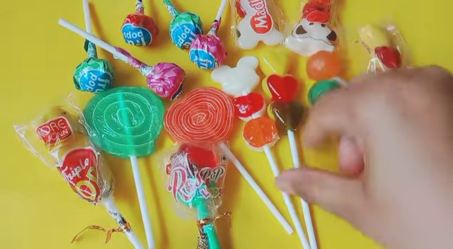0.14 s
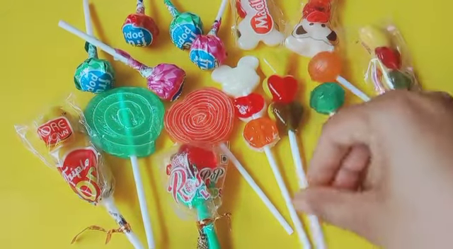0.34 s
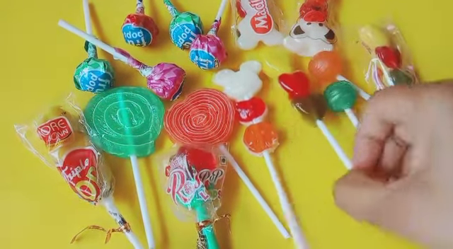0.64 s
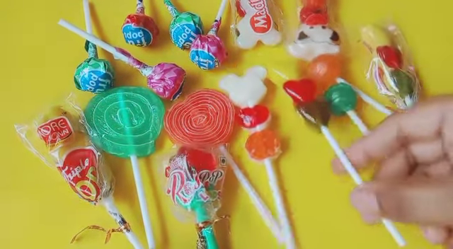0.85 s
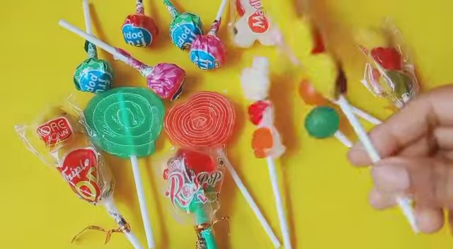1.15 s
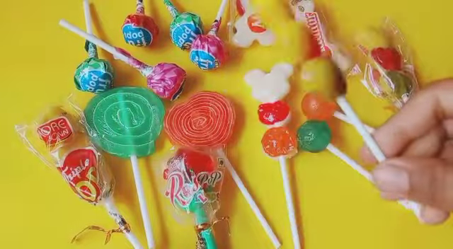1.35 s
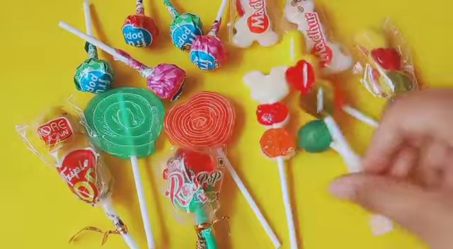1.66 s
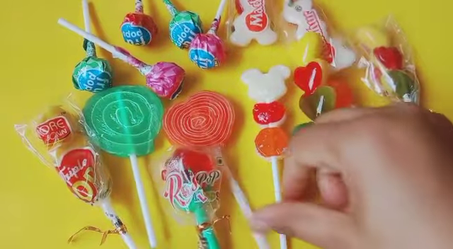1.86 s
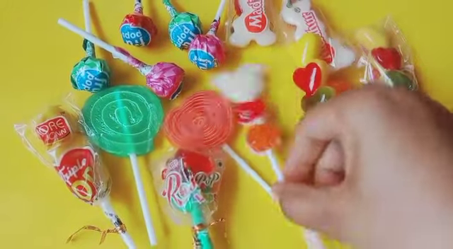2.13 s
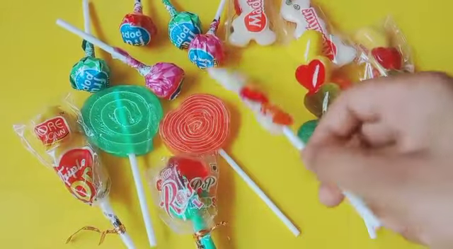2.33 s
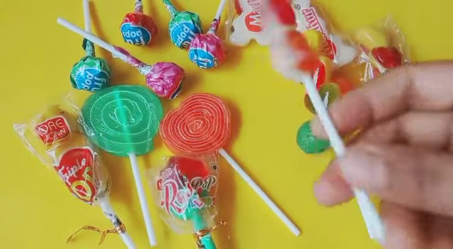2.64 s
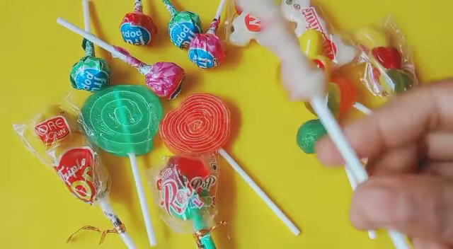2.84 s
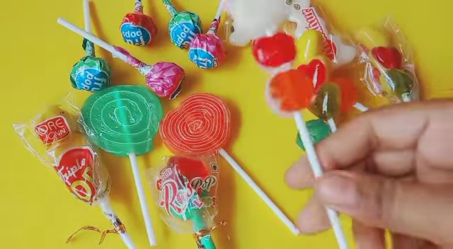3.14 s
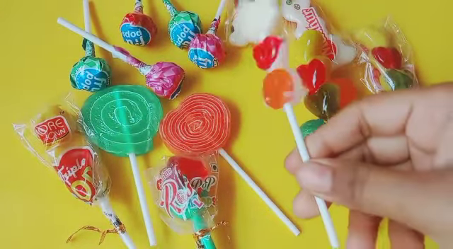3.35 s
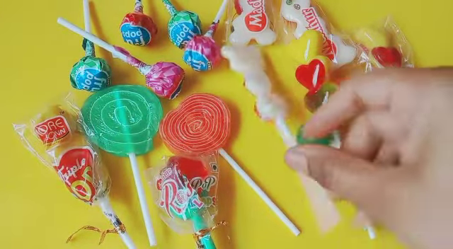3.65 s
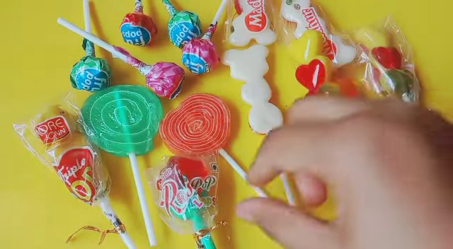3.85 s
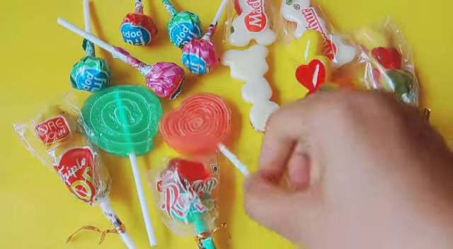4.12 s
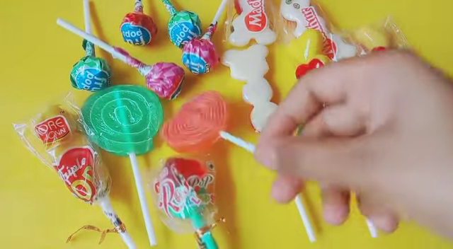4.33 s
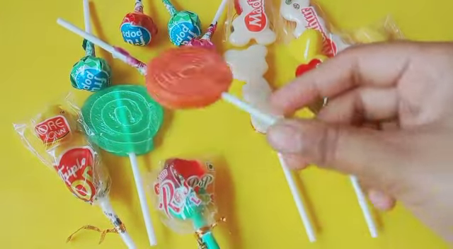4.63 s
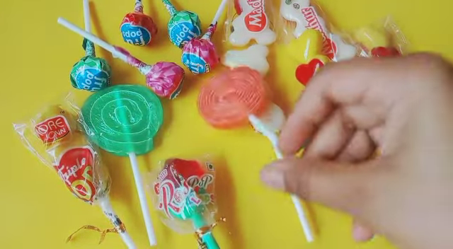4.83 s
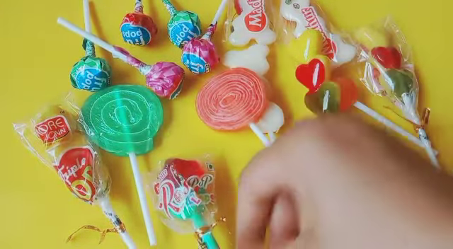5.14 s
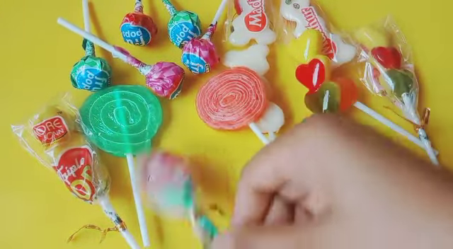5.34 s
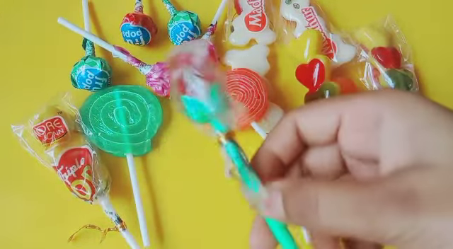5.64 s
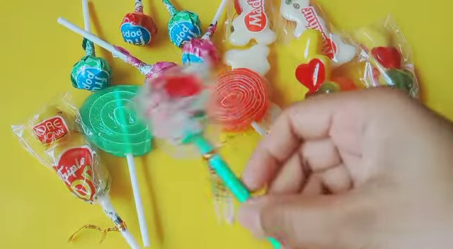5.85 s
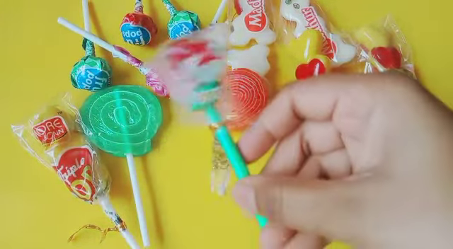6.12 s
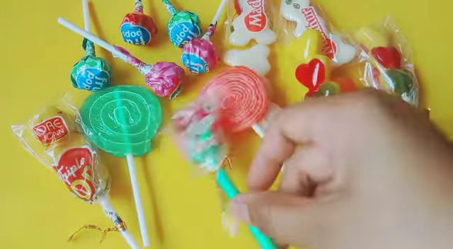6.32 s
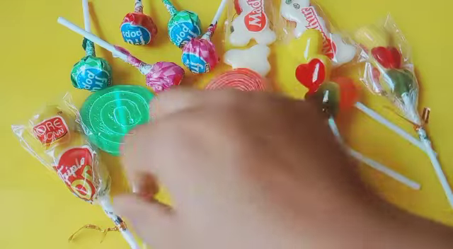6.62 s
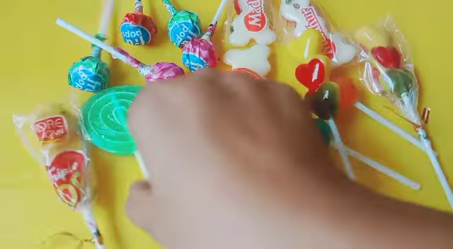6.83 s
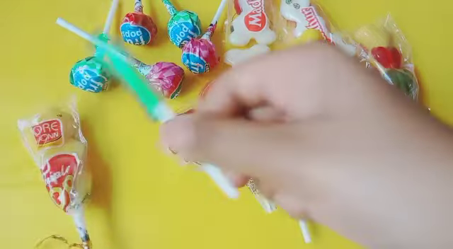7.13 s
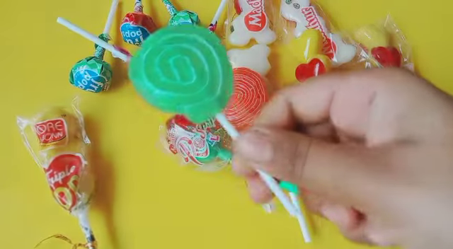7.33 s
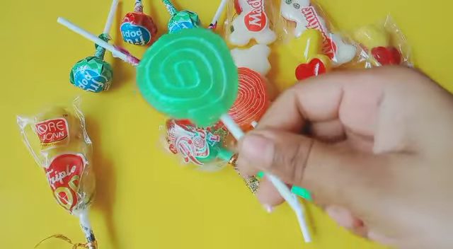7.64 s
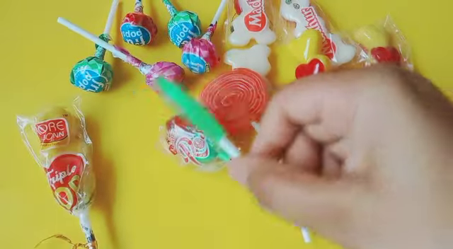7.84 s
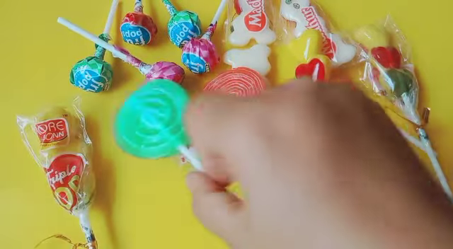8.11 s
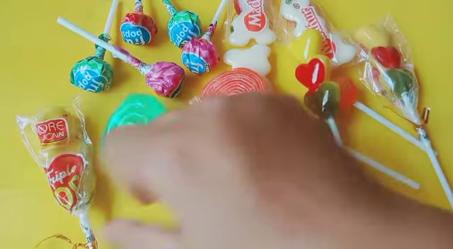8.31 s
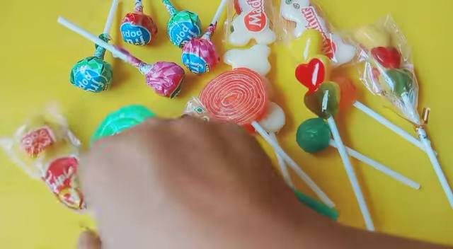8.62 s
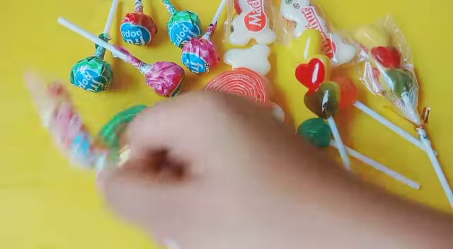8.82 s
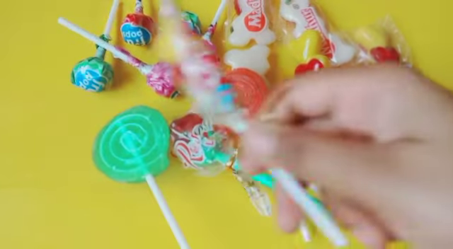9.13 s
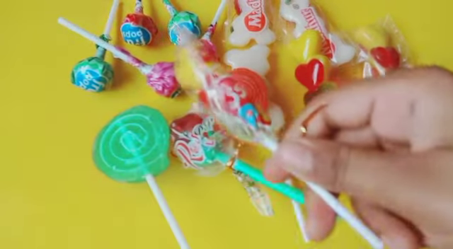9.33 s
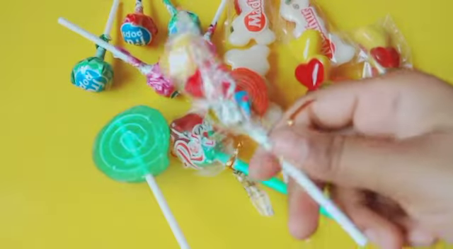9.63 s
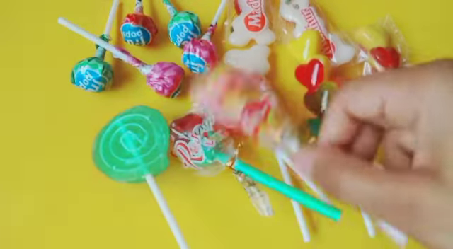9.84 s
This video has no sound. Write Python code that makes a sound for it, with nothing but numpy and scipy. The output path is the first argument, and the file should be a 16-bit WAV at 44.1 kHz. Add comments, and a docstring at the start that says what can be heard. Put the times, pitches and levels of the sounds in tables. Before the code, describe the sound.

Thin plastic sweet wrappers crackle and snap, sparse at first then nearly continuous, with small knocks and scrapes on a light table top, close up.

```python
"""A wrapper crackles and a sweet drags on a light table top, close up, over a low wavering rumble.
Hands pick up and lay down lollipops in a small room: knocks ring the table's modes, slides feed them clicks.
Thin plastic wrappers crackle as showers of clicks ring their facets; single creases snap with a pitch.
Faint narrow hums come and go, and short reflections surround the wrappers and table."""
import sys
import numpy as np
from scipy import signal
from scipy.fft import rfft, irfft
from scipy.io import wavfile
from scipy.ndimage import uniform_filter1d

SR = 44100
rng = np.random.default_rng(int(sys.argv[2]) if len(sys.argv) > 2 else 0)


def unload_wav(signal):
    """Save mono or channel-first audio to the path in sys.argv[1] as 16-bit WAV at rate SR, clipped to [-1, 1]."""
    wavfile.write(
        sys.argv[1],
        SR,
        np.round(np.clip(np.atleast_2d(signal).T, -1, 1) * 32767).astype(np.int16),
    )


N = 439677  # length [samples]

# low room rumble spectrum: (frequency [Hz], density [dB per Hz])
RUMBLE_SPECTRUM = [(20, -28), (45, -18.5), (65, -8), (120, -2.5), (160, -9.5), (200, -3), (300, -14),
                   (500, -15), (1500, -16.5), (3000, -31.5), (5600, -26), (9000, -35.5)]
# fingers squeeze a wrapper: (start [s], length [s], crackle before trim [dB], slack folds against tight ones [dB])
SQUEEZES = [(0.0, 0.0096, -45.5, 10), (0.109, 0.11, -39.5, 15), (0.399, 0.013, -46.5, 15.5),
            (0.463, .05, -50.5, 5.5), (0.709, 0.041, -58, -7.5), (0.846, .1, -50.5, 4.5),
            (0.969, 0.092, -38, 4.5), (1.142, 0.073, -30, 10), (1.255, 0.11, -38.5, 9.5),
            (1.609, 0.23, -41.5, 7.5), (1.922, 0.019, -42.5, 6.5), (2.072, 0.063, -56.5, 14.5),
            (2.154, 0.049, -45.5, 10), (2.626, 0.16, -41.5, 6), (2.884, 0.074, -33, 10),
            (3, 0.15, -32, 2.5), (3.191, 0.19, -27.5, 3.5), (3.416, 0.09, -32, 5.5),
            (3.576, 0.068, -30, 12.5), (3.668, 0.15, -31.5, 6), (4.354, 0.1, -32.5, 5),
            (4.565, 0.024, -28.5, -16.5), (5.12, 0.017, -31.5, 7.5), (5.197, 0.14, -30.5, -4),
            (5.422, 0.074, -30, 4.5), (5.537, 0.017, -32.5, 1), (5.681, 0.041, -29, 0.5),
            (5.743, 0.017, -28, 4.5), (5.903, 0.041, -30, -9), (6.009, 0.067, -33.5, -2.5),
            (6.343, 0.054, -41, 14), (6.529, 0.24, -32, -15.5), (6.84, 0.031, -30.5, 5),
            (6.954, 0.054, -34.5, 2.5), (7.171, 0.13, -33.5, 3.5), (7.444, 0.073, -35, -5.5),
            (7.692, 0.072, -30, -1), (7.758, 0.18, -29.5, 3), (7.978, 0.11, -34, 8), (8.125, 0.035, -27, 6),
            (8.255, 0.16, -29, 5), (8.602, 0.039, -26.5, 0), (8.771, 0.055, -28.5, 1.5),
            (8.892, 0.11, -28, 3.5), (9.198, .14, -29.5, 2.5), (9.418, 0.1, -27, 4),
            (9.589, 0.055, -30, 2.5), (9.73, 0.021, -34, 4.5), (9.853, 0.15, -28.5, 5)]
# wrappers turned in the hand without a break: (time [s], crackle before trim [dB], slack folds [dB])
HANDLING = [(2.84, -99.5, -7), (2.87, -45, -6.5), (3.5, -41, 0.5), (3.88, -50.5, 2.5), (3.92, -40.5, 10),
            (4.3, -43.5, -0.5), (4.5, -34, -17.5), (4.75, -39, -18.5), (4.8, -49, -11), (4.84, -65, -9.5),
            (4.86, -37, -8.5), (4.93, -57, -14.5), (4.96, -40, -11), (5.1, -42, -11.5), (5.6, -41.5, -4),
            (5.85, -38, 2.5), (6.3, -43.5, -1), (6.8, -38.5, 3), (7.12, -42.5, -15.5), (7.3, -33.5, -18),
            (7.68, -41, -16.5), (8.2, -38, 4.5), (8.54, -36, -3), (9.15, -35, 5), (9.36, -36, -2.5),
            (9.7, -34, -4.5), (9.82, -37, -0.5)]
# wrapper as the microphone colours it: (frequency [Hz], density [dB per Hz])
FOIL_SPECTRUM = [(470, -40), (830, -28), (1330, -16), (1770, -12), (2700, -6.5), (3250, -0.5), (4110, -5),
                 (4890, 2), (5680, 4.5), (7010, 1), (9320, -10.5), (14700, -6), (15500, -6.5)]
# sweets and sticks slide over the table: (start [s], length [s], level [dB])
SLIDES = [(0.001, 0.0042, -42.5), (0.077, 0.015, -33), (0.11, 0.012, -21.5), (0.397, 0.0046, -35.5),
          (0.821, 0.2, -48.5), (0.97, 0.029, -42), (1.147, 0.15, -49), (1.645, 0.12, -35.5),
          (1.85, 0.0058, -42.5), (1.923, 0.008, -53.5), (2.14, 0.06, -36), (6.341, 0.025, -40.5),
          (6.72, 0.022, -57), (8.24, 0.025, -51), (8.496, 0.21, -54.5), (8.677, 0.055, -50)]
# sweets knock on the table: (first touch [s], blow level before trims [dB], weight for the low modes [dB])
KNOCKS = [(0.134, -11, -5), (0.178, -14, -17), (0.404, -17.5, -11), (0.482, -27, -17.5), (0.98, -16, -30),
          (1.027, -13.5, -36), (1.04, -19.5, -37), (1.07, -18.5, -44), (1.155, -36, -25.5),
          (1.185, -20, -30), (1.235, -17, 3), (1.263, -0.5, -3.5), (1.61, -9, 1.5), (1.742, -12, -5),
          (2.087, -15, -13), (2.239, -21.5, -11), (2.262, -27.5, -12.5), (3.566, -2, -12),
          (3.696, -2.5, -3), (3.743, -3, -12), (4.156, -36, -15), (4.198, -11, -4), (4.25, -25.5, -21),
          (4.379, -19.5, 4.5), (4.846, -28, 13.5), (4.894, -19.5, 13.5), (4.97, -25.5, -19),
          (5.009, -30.5, 11), (6.342, -22.5, 7), (6.375, -28, -23), (6.42, -15.5, 11.5),
          (6.731, -36.5, 20.5), (6.75, -39, 17.5), (8.248, -31, 25), (8.298, -10.5, -4), (9.863, -14, 13)]
# ringing modes of the table top: (frequency [Hz], level [dB], 60 dB decay of a knock [s])
TABLE_MODES = [(230, 14, 0.099), (331.5, -19, 0.17), (430, -3, 0.068), (502.4, -0.5, 0.062),
               (605, -1.5, 0.029), (725, -8.5, 0.087), (790, -3, 0.053), (952.5, -11.5, 0.27),
               (1060, -3, 0.04), (1186, 7.5, 0.019), (1347, 6, 0.02), (1500, -11, 0.043), (1610, -9, 0.051),
               (1950, -20.5, 0.056)]
# faint narrow hums: (start [s], length [s], pitch [Hz], level before flutter [dB])
HUMS = [(0.46, 0.24, 2550, -74.5), (2.295, 0.23, 1750, -73), (2.337, 0.043, 1230, -48),
        (2.44, 0.066, 1235, -68), (2.69, .08, 1226, -64), (2.81, 0.27, 1260, -56.5), (3.07, .37, 1270, -54),
        (5.282, 0.054, 430, -58.5), (6.253, 0.041, 1104, -60.5), (6.515, 0.04, 1094, -59),
        (7.804, 0.055, 343, -59), (8.196, 0.04, 984, -50), (8.88, 0.11, 1250, -50),
        (9.094, 0.13, 1250, -56)]
# single creases snap: (first touch [s], peak before trim [dB], pitch [Hz])
SNAPS = [(0.478, -32, 6100), (0.9474, -14.5, 6300), (1.0702, 3.5, 6500), (1.0889, 4.5, 7860),
         (1.2649, 6.5, 5160), (1.6118, -3.5, 7100), (1.6975, -9, 6640), (1.8201, -8.5, 5300),
         (2.0887, -16, 2790), (2.765, -19.5, 5450), (2.9325, -5, 5420), (3.113, -6, 5230), (3.14, -8, 5540),
         (3.268, -3.5, 6800), (3.3, -9, 6070), (3.3182, 1, 5860), (3.4459, 6, 4600), (3.5677, 3.5, 3740),
         (3.699, -2, 4500), (3.8108, -9, 7300), (3.9088, -16, 5580), (4.045, -11, 5000),
         (4.066, -14.5, 3480), (4.2018, -4.5, 8300), (4.3666, -5, 4530), (4.437, -1, 5700),
         (4.674, -6.5, 6800), (4.7606, -13.5, 4870), (4.789, -23, 4550), (4.967, -12, 7450),
         (5.057, -12.5, 5800), (5.128, -7.5, 5750), (5.173, -4, 5400), (5.332, -8, 6150), (5.544, -3, 4880),
         (5.687, -8.5, 4500), (5.748, -5.5, 3300), (5.922, -3, 6030), (6.0046, -1.5, 6600),
         (6.163, -11.5, 5970), (6.2243, -1, 4100), (6.3676, -7.5, 7400), (6.585, -2.5, 6200),
         (6.6546, -6.5, 5500), (6.709, 0.5, 5740), (7.1803, -9.5, 5540), (7.211, 0, 6300),
         (7.221, -3, 5560), (7.308, -7, 5300), (7.367, -10, 5800), (7.4088, -8.5, 5800),
         (7.574, -4.5, 5230), (7.7813, 1.5, 6350), (7.835, -5, 3250), (8.0381, -6, 5300),
         (8.074, 0.5, 6100), (8.1996, -1.5, 2540), (8.3, -4.5, 5500), (8.4046, -3, 6200), (8.458, 0, 6850),
         (8.6128, -3.5, 7000), (8.779, -7, 5280), (8.832, -2.5, 6000), (8.8541, 0, 5300),
         (8.9103, -1, 6800), (8.934, -2, 6100), (8.9427, -5, 5980), (9.013, -4, 5800), (9.017, -4.5, 2280),
         (9.096, -9.5, 4500), (9.1476, -9, 5250), (9.2197, 1, 4700), (9.2716, -0.5, 4860), (9.404, 0, 5000),
         (9.4413, -5, 3330), (9.574, -12, 1360), (9.6106, 0, 8350), (9.9323, 3, 5250)]

RUMBLE_DB, RUMBLE_WAVER_DB = -65.5, 2
SQUEEZE_RISE_DB_PER_S, SQUEEZE_SAG_DB_PER_S, SQUEEZE_FALL_DB_PER_S = 2496.5, 0.5, 346
TICK_DB = -10  # bare broad tick of a buckling, against its ring
FACET_SHIFT_DB = 4  # each facet grows louder and softer as the wrapper changes shape
SLIDE_RISE_DB_PER_S, SLIDE_FALL_DB_PER_S = 4995.5, 218
BLOW_LAG_S, SNAP_LAG_S = 0.002503, 0.00081  # from first touch to the main blow
STRIKE_SPREAD_DB = 4.5  # chance in how strongly each mode is fed
RATTLE_DB = -24  # rattle after a light knock, against the blow; heavier knocks rattle less
BOOM_LAG_S = .012  # the whole board swings late
BOOM_GROWTH, BOOM_WEIGHT_SHARE = 0.94, 0.76  # extra dB per dB of blow; share of the weight it feels
TABLE_LOW_CUT_HZ = 314
THUD_DB, THUD_HZ, THUD_T60_S = -38.5, 120, .08  # the table's legs give a little under each blow
HUM_FADE_DB_PER_S, STRAY_HUMS_DB = 350, -72
ROOM_T60_S, ROOM_DB = 0.23, -10
NEAR_T60_S, NEAR_DB = 0.015, -6  # scatter off the table top and the sweets close by
PLACES = 8  # different patterns of close scatter
SUPPRESS_BELOW_DB, SUPPRESS_MOST_DB = -88, -6  # level of one spectral line, deepest cut
CUTOFF_HZ = 16600


def from_db(db):
    """Decibels to gain."""
    return 10 ** (np.asarray(db) / 20)


def rms_one(x):
    """Scale to rms 1."""
    return x / np.sqrt(np.mean(x ** 2) + 1e-20)


def filtered(x, order, hz, kind):
    """Butterworth filter, "high" or "low" pass."""
    return signal.sosfilt(signal.butter(order, hz, kind, fs=SR, output="sos"), x)


def in_time(rows):
    """Each column as a curve, one value a sample."""
    s, *columns = np.transpose(rows)
    return [np.interp(np.arange(N) / SR, s, c) for c in columns]


def drift(rate):
    """Slow chance: noise through a double one-pole low-pass at the given Hz, rms 1."""
    r = np.exp(-2 * np.pi * rate / SR)
    noise = rng.standard_normal(N + SR)
    return rms_one(signal.lfilter([1], [1, -2 * r, r * r], noise)[SR:])


def ring(clicks, hz, t60):
    """Two-pole resonator: a unit click sets a decaying sine ringing."""
    r, w = from_db(-60 / (t60 * SR)), 2 * np.pi * hz / SR
    return signal.lfilter([0, np.sin(w)], [1, -2 * r * np.cos(w), r * r], clicks + 1e-18)


def colour(x, taps):
    """Filter by an impulse response."""
    return signal.fftconvolve(x, taps)[:len(x)]


def response(spectrum):
    """Causal (minimum-phase) impulse response with the given spectrum, by folding the cepstrum."""
    hz, level_db = np.transpose(spectrum)
    grid = np.maximum(np.arange(2049) * SR / 4096, 1)
    cepstrum = irfft(np.log(from_db(np.interp(np.log(grid), np.log(hz), level_db))))
    cepstrum[1:2048] *= 2
    cepstrum[2049:] = 0
    return irfft(np.exp(rfft(cepstrum)))


def strokes(start, length, level_db, rise, sag, fall):
    """Rise, sagging hold and fall (dB per s) of each stroke: the loudest level and which stroke it is."""
    t = np.arange(0, N + 32, 32) / SR
    since = t - start[:, None]
    held = length[:, None]
    shapes = level_db[:, None] + abs(rise) * np.minimum(since, 0)
    shapes = shapes - sag * np.clip(since, 0, held) - abs(fall) * np.maximum(since - held, 0)
    level = np.interp(np.arange(N) / SR, t, np.maximum(shapes.max(axis=0), -120))
    return level, np.repeat(shapes.argmax(axis=0), 32)[:N]


def grains(per_s, spread_db, clump_db, clump_rate):
    """Random clicks of random sign, a few far larger than most, bunched in time."""
    sizes = from_db(spread_db * np.minimum(rng.exponential(1, N), 2.8)) * rng.choice([-1, 1], N)
    born = rng.random(N) < per_s * from_db(clump_db * drift(clump_rate)) / SR
    return rms_one(sizes * born)


def background():
    """Low rumble: coloured noise whose level wavers at two speeds."""
    waver = (drift(1.8) + drift(9.0)) / np.sqrt(2)
    rumble = rms_one(colour(rng.standard_normal(N), response(RUMBLE_SPECTRUM)))
    return from_db(RUMBLE_DB + RUMBLE_WAVER_DB * waver) * rumble


def facets(clicks, cycles, slack_db, count):
    """Each click rings one facet of foil for a few cycles; the low facets are the large slack folds."""
    dealt, out, shift = rng.integers(0, count, N), 0, drift(6.5)
    for k, hz in enumerate(np.geomspace(1200, 15000, count)):
        rung = ring(clicks * (dealt == k), hz, cycles / hz)
        rung = rms_one(ring(rung, hz, cycles / hz))  # a second pass keeps the skirts narrow
        rung = filtered(rung, 2, .6 * hz, "high")  # too small to sound lower
        slackness = np.clip(np.log2(4200 / hz) * 2, 0, 1.3)
        facet_db = slack_db * slackness + FACET_SHIFT_DB * np.roll(shift, k * N // count)
        out = out + rung * np.sqrt(hz) * from_db(facet_db)
    tick = filtered(clicks, 4, 2800, "high")
    return rms_one(rms_one(out) + from_db(TICK_DB) * tick)


def crackle():
    """Small bucklings of the wrappers over a much denser, smoother rustle of the tight folds."""
    start, length, squeeze_db, folds_db = np.transpose(SQUEEZES)
    squeeze_db, which = strokes(start, length, squeeze_db,
                                SQUEEZE_RISE_DB_PER_S, SQUEEZE_SAG_DB_PER_S, SQUEEZE_FALL_DB_PER_S)
    turn_db, turn_folds_db = in_time(HANDLING)
    level_db = np.maximum(squeeze_db, turn_db)
    slack_db = np.where(squeeze_db > turn_db, folds_db[which], turn_folds_db)
    busy = np.clip((level_db + 64.5) / 25, .05, 1)  # a light touch rustles but seldom buckles a crease
    pops = facets(grains(400 * busy, 3.4, 8, 40), 4.8, slack_db, count=24)
    rustle = facets(grains(12000, 1.5, 2.5, 15), 3.5, slack_db - 8, count=10)
    foil = rms_one(colour(pops + from_db(-7.0) * rustle, response(FOIL_SPECTRUM)))
    return from_db(level_db - 2.5) * foil


def table():
    """Knocks strike every mode with a strength of its own; dragging feeds the same modes clumped clicks."""
    s, peak_db, weight_db = np.transpose(KNOCKS)
    at = np.round((s + BLOW_LAG_S) * SR).astype(int)
    where_db = rng.normal(0, STRIKE_SPREAD_DB, (len(s), len(TABLE_MODES)))
    heavy_db = np.maximum(weight_db, 0)
    # after a knock the sweet rattles on and dies like a slide
    rattles = [(s + BLOW_LAG_S, 0, db + RATTLE_DB - max(weight, 0) / 2) for s, db, weight in KNOCKS]
    moves = np.array([*SLIDES, *rattles])
    drag_db, _ = strokes(*moves.T, SLIDE_RISE_DB_PER_S, 0, SLIDE_FALL_DB_PER_S)
    drag, knocked, dragged = grains(1500, 4.2, 5.5, 28), 0, 0
    grip = drift(6.7)  # the grip shifts which modes are fed
    for k, (hz, level_db, t60) in enumerate(TABLE_MODES):
        boom = hz < 280
        blow_db = peak_db + level_db + where_db[:, k] - 18
        blow_db = blow_db + weight_db * np.clip((700 - hz) / 300, 0, 1) * (hz > 280)
        blow_db = blow_db - heavy_db * (hz > 1550)
        blow_db = blow_db + (BOOM_GROWTH * peak_db + BOOM_WEIGHT_SHARE * weight_db) * boom
        clicks = np.zeros(N)
        clicks[at + round(BOOM_LAG_S * SR) * boom] = -from_db(blow_db)
        knocked = knocked + ring(clicks, hz, t60)
        grip_db = STRIKE_SPREAD_DB * np.roll(grip, k * N // len(TABLE_MODES))
        fed = from_db(level_db - 40 * (hz < 350) + grip_db)
        dragged = dragged + fed * ring(drag, hz, 0.7 * t60) * (-1) ** k
    # the hard contact itself: a short dull crack beside the modes
    contact = np.zeros(N)
    contact[at] = -from_db(peak_db - 14 - heavy_db)  # heavy blows are duller
    crack = ring(contact, 1300, 0.0016)
    sound = knocked + crack + from_db(drag_db) * rms_one(dragged)
    sound = filtered(sound, 4, 2200, "low")  # the blows are soft enough to carry little treble
    push = np.zeros(N)
    push[at] = from_db(peak_db + weight_db / 2)
    push = colour(push, np.hanning(200) / 100)  # a soft push
    push = filtered(push, 4, 75, "high")
    thud = from_db(THUD_DB) * ring(push, THUD_HZ, THUD_T60_S)
    # a small light board radiates no deep bass
    return filtered(sound, 4, TABLE_LOW_CUT_HZ, "high") + thud


def hums():
    """Narrow tones wander in phase, flutter and fade; narrow noise bands at fixed pitches flicker up."""
    t, wander, out = np.arange(N) / SR, drift(12), 0
    for start, length, hz, db in HUMS:
        tone = np.sin(2 * np.pi * hz * t + wander) * from_db(5 * wander[::-1])
        outside = np.maximum(np.maximum(start - t, t - start - length), 0)
        out = out + tone * from_db(db - HUM_FADE_DB_PER_S * outside)
    noise, flicker = rng.standard_normal(N), drift(3)
    for k, hz in enumerate(np.geomspace(330, 2000, 12)):
        band = rms_one(ring(ring(noise, hz, .06), hz, .06))
        swell = np.maximum(np.roll(flicker, k * N // 12) - 1, 0)  # only the crests are heard
        out = out + band * from_db(STRAY_HUMS_DB) * swell
    return out


def snaps():
    """A crease flips: a broad tick, a ring at its own pitch and a dying spatter of after-clicks."""
    out, t, foil = np.zeros(N + 3000), np.arange(1500) / SR, response(FOIL_SPECTRUM)[:600]
    spatter = rng.laplace(0, 1, (len(SNAPS), len(t)))
    under = rng.uniform(.35, .7, len(SNAPS))  # a larger fold rings along, lower
    for (s, peak_db, hz), after, ratio in zip(SNAPS, spatter, under):
        clicks = from_db(-20) * after * from_db(-60 * t / 0.0072)
        clicks[0] = 1
        low_hz = ratio * hz
        burst = 0.052 * clicks + ring(clicks, hz, 4.8 / hz) + 0.2 * ring(clicks, low_hz, 5.0 / low_hz)
        burst = filtered(colour(burst, foil), 3, hz / 2.4, "high")  # too small to sound lower
        at = round((s + SNAP_LAG_S) * SR)
        out[at:at + len(t)] += from_db(peak_db - 7.5) * burst / np.abs(burst).max()
    return out[:N]


def room(x):
    """Dense reflections on two slopes: quick close scatter in shifting patterns, then the walls' duller tail."""
    t, noise = np.arange(SR // 2) / SR, rng.standard_normal(SR // 2)
    walls = signal.lfilter([1], [1, -.3], noise * from_db(-60 * t / ROOM_T60_S) * (t > .004))
    out = from_db(ROOM_DB) * colour(x, walls / np.linalg.norm(walls))
    place = np.repeat(rng.integers(0, PLACES, N // 512 + 1), 512)[:N]  # a random pattern every 512 samples
    fade = (from_db(-60 * t / NEAR_T60_S) * (t > .0007))[:1500]
    for k, near in enumerate(rng.standard_normal((PLACES, 1500)) * fade):
        scatter = signal.oaconvolve(x * (place == k), near / np.linalg.norm(near))[:N]
        out += from_db(NEAR_DB) * scatter
    return out


def suppress(x):
    """Noise suppressor: above the bass, parts of the spectrum that sink near the threshold are turned down."""
    hz, _, z = signal.stft(x, SR, nperseg=512)
    power = uniform_filter1d(np.abs(z) ** 2, size=7, axis=-2)  # smooth over pitch, then time
    power = uniform_filter1d(power, size=3, axis=-1)
    gain = np.maximum(power / (power + from_db(2 * SUPPRESS_BELOW_DB)), from_db(SUPPRESS_MOST_DB))
    gain[:, hz < 300] = 1
    return signal.istft(z * gain, SR, nperseg=512)[1][:, :N]


def scene():
    """Wrappers and table in the room, with the hums and the background."""
    near = crackle() + snaps() + table()
    return (near + room(near) + hums() + background())[None]


def record(dry):
    """Quiet parts are suppressed, the highest peaks rounded, the deep bass and the top cut."""
    rounded = .92 * np.tanh(suppress(dry) / .92)
    rounded = filtered(rounded, 1, 30, "high")
    return signal.sosfilt(signal.cheby2(12, 60, CUTOFF_HZ, fs=SR, output="sos"), rounded)


dry = scene()
out = record(dry)
unload_wav(out)
```